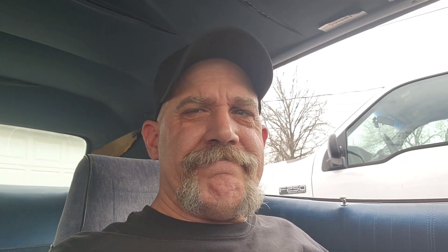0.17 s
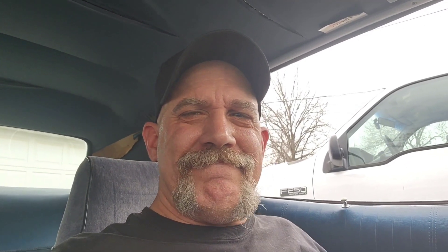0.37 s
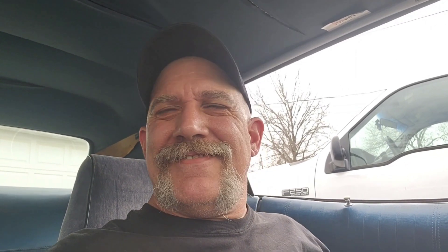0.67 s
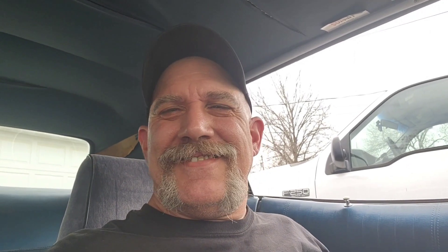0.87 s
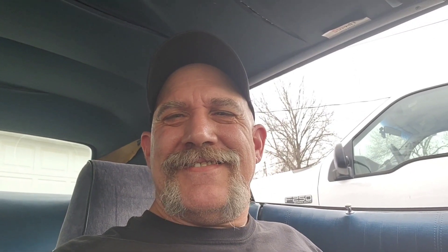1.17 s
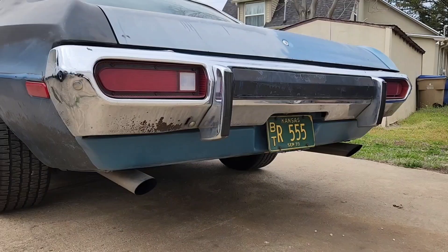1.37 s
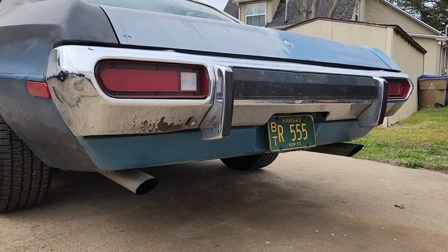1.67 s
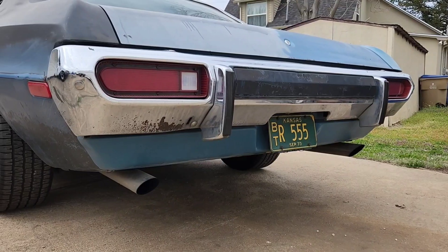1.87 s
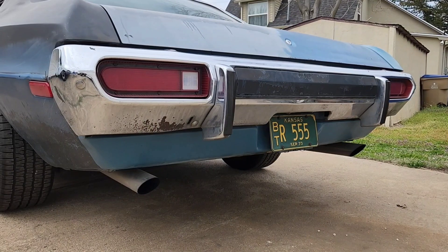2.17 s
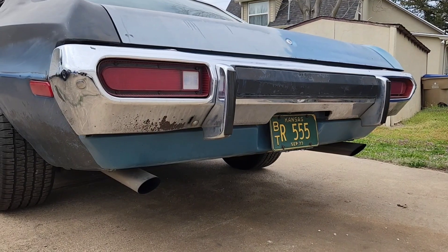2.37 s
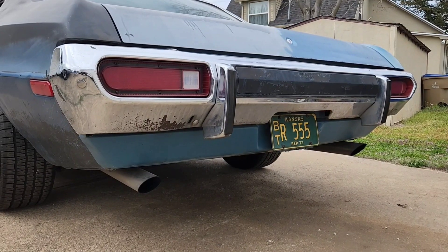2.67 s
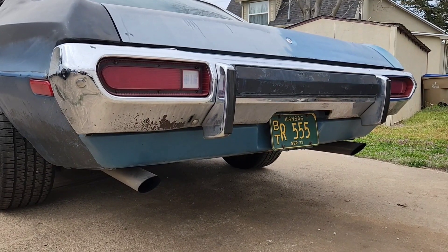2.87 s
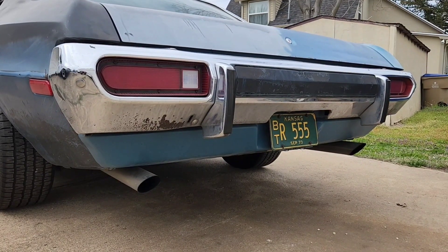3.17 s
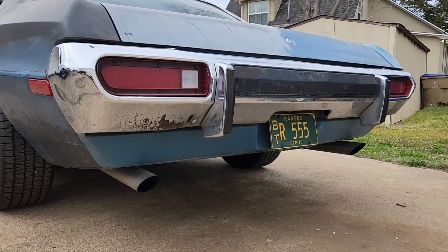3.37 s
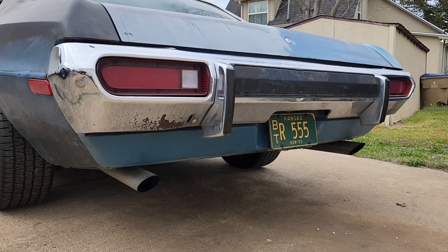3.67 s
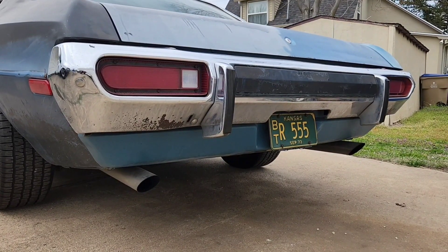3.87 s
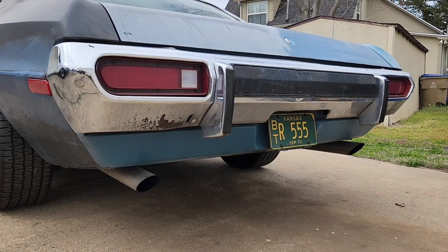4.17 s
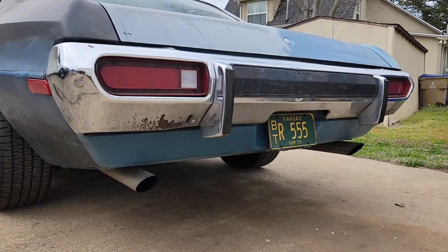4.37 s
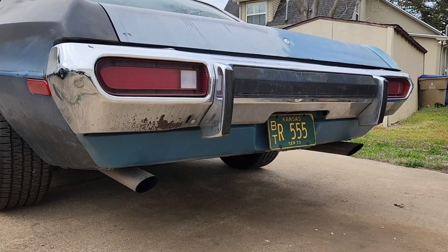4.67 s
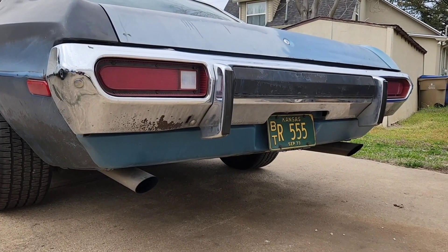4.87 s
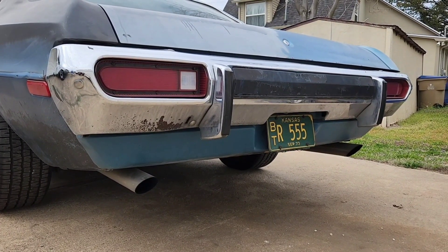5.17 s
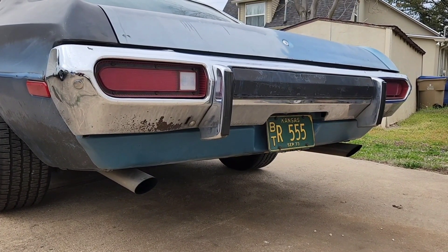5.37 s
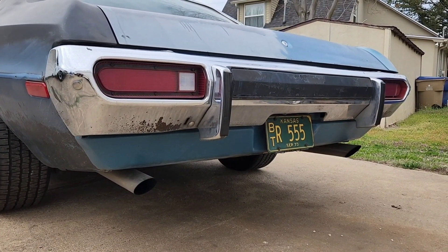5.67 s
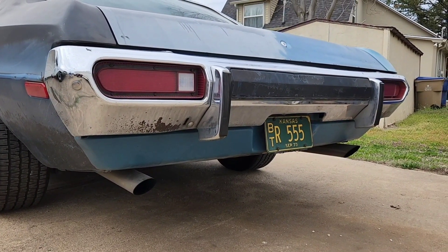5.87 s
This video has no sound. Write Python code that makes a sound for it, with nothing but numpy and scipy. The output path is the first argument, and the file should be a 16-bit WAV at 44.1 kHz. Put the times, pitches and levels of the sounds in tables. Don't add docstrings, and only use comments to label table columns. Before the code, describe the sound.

After faint birds and cabin rustling, a starter clanks and labours behind an old car; its engine fires raggedly and burbles at a fast idle.

```python
import sys
import numpy as np
from scipy import signal
from scipy.fft import rfft, irfft
from scipy.io import wavfile
from scipy.ndimage import uniform_filter1d

SR = 44100
rng = np.random.default_rng(int(sys.argv[2]) if len(sys.argv) > 2 else 0)


def persist_wave(psi):
    counts = np.round(np.clip(psi, -1, 1) * 32767).astype(np.int16)
    wavfile.write(sys.argv[1], SR, np.atleast_2d(counts).T)


def magnitude_from_level(level_db):
    exponent = np.asarray(level_db, float) / 20
    return 10 ** exponent


N = 265437
T = np.arange(N) / SR
CABIN_END_S, YARD_START_S = 1.306, 1.317


def evened(x):
    return x / np.sqrt(np.mean(x ** 2) + 1e-20)


def read(points, hz):
    f, value = np.transpose(points)
    return np.interp(np.log(hz + 1), np.log(f + 1), value)


def curve(rows):
    s, value = np.transpose(rows)
    return np.interp(T, s, value)


# (frequency [Hz], likeness [0-1])
SAME = [(60, 0.98), (300, 0.8), (640, 0.75), (1400, 0.3), (3000, 0.18), (8000, 0.24)]


def noise(spectrum, patchy_db=2.5):
    frames, hz = N // 256 + 5, np.fft.rfftfreq(1024, 1 / SR)
    a, b, c, d, patches = rng.standard_normal((frames, 513, 5)).T
    patches = uniform_filter1d(patches, size=10, axis=0)
    patches = evened(uniform_filter1d(patches, size=8, axis=1))
    same = np.clip(read(SAME, hz), 0, 1)[:, None]
    left = a + 1j * b
    right = same * left + np.sqrt(1 - same ** 2) * (c + 1j * d)
    z = np.array([left, right]) * magnitude_from_level(read(spectrum, hz)[:, None] + patchy_db * patches)
    return evened(signal.istft(z, nperseg=1024, noverlap=768)[1][:, :N])


def hiss_source(common=0.0):
    return rng.standard_normal((2, N)) + common * rng.standard_normal(N)


def ring(x, modes):
    out = 0
    for hz, width, db in modes:
        r = np.exp(-np.pi * width / SR)
        poles = [1, -2 * r * np.cos(2 * np.pi * hz / SR), r * r]
        out = out + magnitude_from_level(db) * signal.lfilter([1 - r], poles, x) * hz / SR
    return out


def train(s, size):
    return np.bincount(np.round(s * SR).astype(int), size, N)[:N]


def puff(clicks, rise_s, fall_s):
    t = np.arange(4000) / SR
    shape = np.exp(-t / fall_s) - np.exp(-t / rise_s)
    return np.sqrt(abs(signal.oaconvolve(clicks ** 2, shape)[:N]))


def lay(sounds):
    out = np.zeros((2, N))
    for s, sound in sounds:
        out[:, round(s * SR):][:, :sound.shape[-1]] += sound
    return out


# (frequency [Hz], density [dB per Hz])
CABIN = [(12, -49), (20, -15.5), (62, 9), (87, -8.5), (184, -26), (583, -36.5), (632, -27.5), (762, -37),
         (895, -33), (1610, -34), (1840, -26.5), (3060, -22.5), (4340, -37), (5230, -31.5), (7900, -43.5),
         (8700, -53), (15600, -72), (22000, -120)]
YARD = [(12, -34), (20, -19), (60, 4), (114, -9.5), (248, -32), (423, -45), (471, -44), (1790, -36.5),
        (3060, -25), (4580, -36), (5100, -29), (7800, -54), (8600, -70), (15600, -101), (22000, -120)]


def air():
    cabin = magnitude_from_level(-52.5) * noise(CABIN, patchy_db=3.5) * (T < CABIN_END_S)
    yard = magnitude_from_level(-51) * noise(YARD, patchy_db=-3.0) * (T > YARD_START_S)
    return cabin + yard


# (frequency [Hz], width [Hz], level [dB])
SETTLE = [(363, 59, -8), (530, 39, -4), (900, 39, -13), (1090, 150, -2.5), (1610, 58, 1), (1730, 150, -8),
          (2150, 90, 6.5), (2360, 49, -7), (2800, 52, -17), (3210, 27, -34), (3660, 86, -14),
          (4240, 42, -31)]
# (time [s], level [dB], t60 [s])
SETTLES = [
    (0, -47.5, 0.67),
    (1.318, -54.5, 0.8),
]


def settling_hiss():
    level = sum(magnitude_from_level(db - 60 * abs(T - s) / t60) * (T >= s) for s, db, t60 in SETTLES)
    return evened(ring(hiss_source(), SETTLE)) * level


def bird(s, length, hz, slide_hz, db):
    slide_s, edge_s, echo_db, echo_t60_s = 0.0236, 0.013, -41.5, 0.57
    t = np.arange(0, length, 1 / SR)
    waver, flutter = uniform_filter1d(rng.standard_normal((2, 12000)), size=200)[:, :len(t)]
    level = magnitude_from_level(db + 1.1 * evened(flutter)) * np.clip(np.minimum(t, length - t) / edge_s, 0, 1)
    pitch = (hz + slide_hz * np.exp(-t / slide_s)) * (1 + 0.0061 * evened(waver))
    tone = np.sqrt(2) * level * np.sin(2 * np.pi * np.cumsum(pitch) / SR)
    echo = rng.standard_normal(3000) * magnitude_from_level(echo_db - 60 * np.arange(3000) / SR / echo_t60_s)
    echo[0] = 1
    end = round((CABIN_END_S - s) * SR) if s < CABIN_END_S else None
    return s, signal.fftconvolve(tone, echo)[:end]


# (start [s], length [s], pitch [Hz], opening slide from above [Hz], level [dB])
BIRDS = [(0.22, 0.049, 4550, 20, -55), (.345, 0.046, 5100, -250, -43), (0.333, 0.064, 3370, -55, -58),
         (0.425, 0.092, 3440, 17, -56), (0.426, 0.11, 5830, 150, -60), (1.035, .03, 9000, 20, -75),
         (1.06, 0.047, 8750, 100, -75), (1.35, .05, 6840, -100, -75), (1.395, .03, 8350, 20, -74),
         (1.72, .04, 9950, 20, -87), (1.835, .04, 4700, 50, -64), (1.106, 0.047, 5300, 254, -47.5),
         (1.145, 0.11, 6050, -100, -64), (1.14, 0.056, 7850, -200, -67), (1.195, 0.036, 7200, 200, -62),
         (1.22, 0.04, 6400, -100, -66), (1.227, 0.062, 4680, 202, -46.5), (1.235, .035, 7750, -100, -67),
         (1.281, 0.028, 3100, -150, -55), (1.283, .025, 6050, 20, -63), (1.378, 0.048, 5710, 98, -54.5),
         (1.465, 0.06, 5560, 20, -61), (1.516, 0.089, 5480, 120, -49), (1.585, 0.049, 5640, -120, -53),
         (1.616, 0.035, 5460, 100, -47.5), (1.665, 0.23, 4080, 250, -54.5), (1.72, .04, 6620, 17, -72),
         (1.81, .05, 10700, 20, -81), (1.84, .04, 7200, 500, -71), (1.88, 0.04, 8200, -100, -68)]


def birds():
    return lay([bird(*b) for b in BIRDS])


def rustle(s, db, hz, width, length):
    cloth = [(hz, width, 0)]
    scrape = ring(ring(rng.standard_normal((2, 4000)), cloth), cloth)[:, -round(length * SR):]
    swell = np.sin(np.pi * np.linspace(0, 1, scrape.shape[1]) ** 0.82) ** 2
    return s, magnitude_from_level(db) * evened(scrape) * swell


# (time [s], level [dB], centre [Hz],
# width [Hz], length [s])
RUSTLES = [(0.25, -56, 4020, 1200, 0.036), (0.31, -55, 2770, 3000, 0.086), (0.37, -49, 3860, 990, 0.061),
           (0.44, -56.5, 1190, 805, 0.016), (0.475, -55, 2740, 800, 0.046), (0.528, -47.5, 600, 935, 0.05),
           (0.304, -64, 600, 300, 0.085), (0.686, -62, 2800, 1000, 0.036), (0.817, -68, 3000, 800, 0.026),
           (0.861, -60.5, 6700, 5000, 0.031), (0.89, -61, 2800, 1000, 0.055), (0.99, -60, 2900, 900, 0.03),
           (1.104, -53, 3000, 5000, 0.0064), (1.113, -57, 2900, 1200, 0.069),
           (1.396, -59, 4060, 1200, 0.063), (1.473, -57, 2690, 800, 0.052), (1.772, -66, 507, 120, 0.096),
           (1.852, -65, 493, 120, 0.11), (0.607, -58, 2420, 1500, 0.017)]


def rustles():
    return lay([rustle(*r) for r in RUSTLES])


def bump(s, db, hz, length):
    t = np.arange(round(length * SR)) / SR
    return s, magnitude_from_level(db) * np.sin(2 * np.pi * hz * t) * np.sin(np.pi * (t / length) ** 0.42) ** 2


# (time [s], level [dB], pitch [Hz], length [s])
BUMPS = [
    (0.59, -28.5, 139, 0.051),
    (1.098, -41.5, 73, 0.072),
]


def bumps():
    return lay([bump(*b) for b in BUMPS])


def load_gain(clash_db, clash_fall_db_per_s, crank_db, tiring_db_per_s, stroke_db):
    since = T - 1.944
    rise = magnitude_from_level(954 * np.minimum(since, 0)) * (since > -.032)
    clash = magnitude_from_level(clash_db - clash_fall_db_per_s * np.maximum(since, 0))
    strain = np.cos(2 * np.pi * (T - 2.1) / 0.18)
    crank = magnitude_from_level(crank_db + tiring_db_per_s * since + stroke_db * strain)
    return rise * np.hypot(clash, crank) * np.clip((2.385 - T) / 0.028, 0, 1)


def overrun_gain():
    drag_db, coast_db, release_s, stop_s = -26.5, -34.5, 2.545, 2.775
    edges = np.clip((T - 2.33) / 0.02, 0, 1) * np.clip((stop_s - T) / 0.043, 0, 1)
    released = np.clip((T - release_s) / 0.012 + .5, 0, 1)
    soft_db = -4.5 * (T < 2.385)
    return edges * magnitude_from_level(drag_db + (coast_db - drag_db) * released + soft_db)


# (time [s], rate [Hz])
PINION = [
    (1.92, 1406),
    (2.06, 1300),
    (2.13, 1198),
    (2.2, 880),
    (2.265, 1113),
    (2.33, 942),
    (2.6, 1325),
]


def pinion_teeth():
    waver = evened(uniform_filter1d(rng.standard_normal(N), size=300))
    phase = np.cumsum(curve(PINION) * (1 + .03 * waver)) / SR
    return np.diff(np.floor(phase), prepend=0) * magnitude_from_level(4.3 * rng.standard_normal(N))


def heave():
    rumble = noise([(20, -1), (45, -1), (86, 5.5), (130, -7), (250, -15), (400, -67)])
    return load_gain(-35, 60, -35.5, -1, -2) * rumble


# (frequency [Hz], width [Hz], level [dB])
HOUSING = [(547, 8, 5), (670, 35, 3.5), (944, 160, -7.5), (1100, 340, -7.5), (1470, 170, -3.5)]


def whine(teeth):
    rattle = 1.25 * rng.standard_normal((2, N))
    return load_gain(-27, 99, -33, -1, 2.5) * evened(ring(evened(teeth) + rattle, HOUSING))


# (frequency [Hz], density [dB per Hz])
GRIND = [(150, -24), (250, 3), (475, -20), (546, -4.5), (660, -5), (785, -21), (984, -8), (1170, -11.5),
         (1570, -12), (1740, -5), (3090, -6.5), (5290, -6), (8600, -21.5), (14500, -21), (15800, -39)]


def grind(teeth):
    scrape = noise(GRIND, patchy_db=1.6) * (0.65 + evened(puff(teeth, .0001, 0.0014)) * 0.18)
    dull = signal.sosfilt(signal.butter(1, 9000, fs=SR, output="sos"), scrape)
    loaded = np.where(T < 2.0, scrape, dull) * load_gain(-19.5, 302, -42, 11, 2)
    dragged = np.roll(scrape, SR // 2, axis=1) * overrun_gain()
    return magnitude_from_level(4.5) * (loaded + dragged)


# (frequency [Hz], level [dB], t60 [s])
CLANG = [(556, 0, .25), (1480, -4, .15), (1590, -2, .3), (2070, -3, .12)]


def clang():
    t = np.maximum(T - 1.944 + .015, 0)
    tones = sum(magnitude_from_level(-26 + db - 60 * t / t60) * np.sin(2 * np.pi * hz * t) for hz, db, t60 in CLANG)
    return tones * np.minimum(t / 0.0057, 1)


# (time [s], level [dB], pitch [Hz], length [s])
GROANS = [(2.0, -28.5, 128, 0.19), (1.955, -31, 81, 0.13), (2.09, -28, 83, .17), (2.09, -31, 45, 0.25),
          (2.25, -30, 84, .11), (2.15, -37, 215, 0.092), (2.25, -46, 530, 0.069), (2.07, -43, 2300, 0.095),
          (2.06, -36, 645, 0.085), (2.1, -51, 650, .06), (4.7, -38, 1400, .05)]


def groans():
    return lay([bump(*g) for g in GROANS])


# (frequency [Hz], width [Hz], level [dB])
SQUEAL = [(5400, 120, 0), (1480, 90, -5)]


def squeal():
    start_s, start_db, fade_db_per_s = 2.385, -21.5, 122
    level = magnitude_from_level(start_db - fade_db_per_s * abs(T - start_s)) * (T > start_s)
    return evened(ring(hiss_source(), SQUEAL)) * level


def starter():
    teeth = pinion_teeth()
    return heave() + whine(teeth) + grind(teeth) + clang() + groans() + squeal()


def warming(idle_db, db_per_s):
    return idle_db + db_per_s * np.maximum(T - 4, 0)


def blow_level_db():
    return warming(-12.5, 1.07)


def silencer_level_db():
    return warming(-29, 3)


def hiss_level_db():
    return warming(-33.5, 0.7)


# (frequency [Hz], density [dB per Hz])
BAY = [(190, 5), (330, -3.5), (376, -11.5), (683, -13), (765, -38), (857, -6), (1130, -22), (1440, -12.5),
       (1690, -20.5), (5250, -16), (6910, -28), (13000, -32.5), (15000, -44), (15800, -33)]


def engine_bay():
    return noise(BAY, patchy_db=1.2) * magnitude_from_level(hiss_level_db() + 5) * np.clip((T - 2.38) / 0.021, 0, 1)


# (time [s], spit level [dB], blow level [dB])
CATCH = [(2.3808, -11.5, -2.5), (2.4175, -21, -4), (2.4383, -8, -5), (2.4589, -22, -7), (2.4781, -7, -4),
         (2.4985, -9, -11.5), (2.5157, -27, -6.5), (2.5291, -7, -15), (2.5617, -24, -5.5),
         (2.6211, -19, -7), (2.6507, -16, -58), (2.672, -19.5, -14), (2.6994, -14.5, -7), (2.731, -21, -26),
         (2.747, -17, -54), (2.7765, -23, -13), (2.809, -24.5, -15), (2.8417, -30, -15.5),
         (2.8734, -29, -14)]
FIRST_S, FIRST_SPIT_DB, FIRST_BLOW_DB = np.transpose(CATCH)
# (frequency [Hz], density [dB per Hz])
SPIT = [(530, -59), (900, -13.5), (1010, -2.5), (1120, -12.5), (1440, -8.5), (1660, -20), (2010, -8),
        (2320, -23), (3790, -3), (5300, 1), (6980, -17), (12900, -18), (15800, -33)]
# (frequency [Hz], width [Hz], level [dB])
TIP = [(2900, 370, 12), (3826, 240, 1.5), (4420, 140, -39), (5680, 220, -17.5)]
# (time [s], level [dB])
SPURTS = [(2.906, 6.5), (2.982, 4.5), (3.028, 1.5), (3.076, -5.5), (3.155, 4.5), (3.202, 3.5), (3.355, 0.5),
          (3.37, -2), (3.4, 2), (3.446, -5.0), (3.596, -4), (3.641, 2.5), (3.733, -6.0), (3.856, 4.0),
          (3.887, -14), (3.933, -1.5), (3.963, -8), (3.979, 3.5), (4.009, 3), (4.085, 1.5), (4.251, 3.5),
          (4.297, 2.5), (4.327, 1.5), (4.372, -7.5), (4.417, -10), (4.492, 4), (4.537, 0), (4.568, 1),
          (4.583, -1), (4.613, -13), (4.705, -3.5), (4.735, 2), (4.81, -4), (4.825, 3.5), (4.9, 3.5),
          (4.974, 5.5), (5.049, 1), (5.093, 3), (5.137, 3), (5.182, -1), (5.211, 1), (5.255, -0.5),
          (5.285, 2), (5.329, -13), (5.416, -10), (5.49, 1), (5.519, -2), (5.563, -3.5), (5.637, -17),
          (5.681, 3), (5.726, -7), (5.756, 1), (5.8, 2), (5.845, 1), (5.875, 4.5), (5.92, -27), (5.965, -6),
          (6.011, -1)]
FORE_DB = (-40, -9, -40, -7, -40, -40, -16, -40)


def tailpipe_hiss(s, heard_s, near, steady, spit_db, cylinder):
    lead_s, fore_s = .0013, .004
    spurt_db = 0.8 * rng.standard_normal(len(s))
    spurt_db += sum(db * (abs(s - at) < .006) * near for at, db in SPURTS)
    spits = train(heard_s - lead_s, steady * magnitude_from_level(spit_db + spurt_db)) * magnitude_from_level(hiss_level_db() + 8.5)
    spits += train(FIRST_S - lead_s, magnitude_from_level(FIRST_SPIT_DB - 4))
    fore = train(heard_s - lead_s - fore_s, steady * magnitude_from_level(np.array(FORE_DB)[cylinder]))
    fore = fore * magnitude_from_level(hiss_level_db() + 9.5)
    gush = np.hypot(1.2 * puff(spits, .0008, .0022), 1.3 * puff(fore, .0005, .0012))
    hiss = gush * noise(SPIT, patchy_db=4.5) * magnitude_from_level(2.0)
    return hiss + magnitude_from_level(18) * ring(hiss, TIP)


def bang():
    u = np.arange(-200, 201) / SR / 0.00099
    clicks = train(FIRST_S + .0014, magnitude_from_level(FIRST_BLOW_DB - 5.5))
    return signal.oaconvolve(clicks, -u * np.exp(-u ** 2 / 2), "same")


# (place [firing steps], sign [+-1], level [dB])
KNOCKS = [(.3, 1, -5), (.95, -1, -6), (1.65, 1, -6), (2.75, -1, -1.5), (3.3, 1, -4.5), (3.7, -1, -7),
          (4.15, 1, -11), (4.65, -1, -10), (5.15, 1, -10), (5.65, -1, 0), (6.2, 1, -5.5), (6.6, -1, -7),
          (7.1, 1, -11), (7.8, -1, -6)]
# (frequency [Hz], width [Hz], level [dB])
SHELL_MODES = [(454, 72, -7), (633, 140, -2), (600, 40, 3.5), (684.8, 19.4, 9), (990, 150, -4)]


def shell_knocks(turn):
    cycles = int(turn[-1]) // 8 + 1
    place, sign, knock_db = np.transpose(KNOCKS)
    place = (place + 8 * np.arange(cycles)[:, None] - 2).ravel()
    size = (sign * magnitude_from_level(knock_db + 1.5 * rng.standard_normal((cycles, len(sign))))).ravel()
    keep = (place > 14) & (place < turn[-1] - 1)
    struck = train(np.interp(place[keep], turn, T), size[keep])
    struck = struck + train(FIRST_S, magnitude_from_level(FIRST_BLOW_DB + 8.5))
    return magnitude_from_level(silencer_level_db() + 79) * ring(ring(struck, [(600, 450, 0)]), SHELL_MODES)


# (frequency [Hz], width [Hz], level [dB])
SILENCER = [(474, 15, -5), (570, 25, -8), (600, 36, 0), (669, 13.4, 5), (984, 57, -7), (1440, 45, -15.5)]


def silencer_roar(clack_s, burn, ring_db):
    uneven_db = 1.2 * rng.standard_normal(len(burn))
    rings = train(clack_s, .25 * burn * magnitude_from_level(ring_db + uneven_db)) * magnitude_from_level(silencer_level_db() + 11.0)
    rings += train(FIRST_S, magnitude_from_level(FIRST_BLOW_DB - 2.0))
    return magnitude_from_level(-12) * evened(ring(hiss_source(2), SILENCER)) * puff(rings, .002, .006)


CLACKS_DB = (-2, -12, -10, -12, -14, -5, -14, -9)


def baffle_clacks(clack_s, burn, cylinder):
    clacks = train(clack_s, burn * magnitude_from_level(np.array(CLACKS_DB)[cylinder])) * magnitude_from_level(silencer_level_db() - 3)
    first_db = (FIRST_SPIT_DB + FIRST_BLOW_DB) / 2 + np.where(FIRST_S < 2.59, -7, -19.5)
    clacks = clacks + train(FIRST_S, magnitude_from_level(first_db + 6.5))
    tip = evened(ring(hiss_source(0.78), [(1450, 67, 7.5), (1021, 21, 1)]))
    return tip * puff(clacks, 0.0019, 0.0035)


def pipe(clicks, modes, direct):
    t = np.arange(SR // 2) / SR
    slug = t[:600] * np.exp(-t[:600] / .0009)
    body = sum(size * magnitude_from_level(-60 * t / t60) * np.cos(2 * np.pi * hz * t) for hz, t60, size in modes)
    body[0] += direct
    out = signal.fftconvolve(signal.oaconvolve(clicks, slug / slug.sum()), body)[:N]
    return signal.sosfilt(signal.butter(3, 350, fs=SR, output="sos"), out)


# (frequency [Hz], t60 [s], size [signed])
NEAR_PIPE = [(43, .4, .024), (62, .4, -.029), (89.2, .4, -.145), (116.3, .4, -.169), (164.3, .108, -.368),
             (184.7, .4, .053), (230.6, .343, -.06), (291, .4, -.013)]
FAR_PIPE = [(47, .051, -.239), (72.8, .05, .234), (90.4, .4, -.173), (111.6, .4, -.022), (161.6, .4, .07),
            (168.3, .4, -.141), (244, .276, -.055), (271, .4, -.021)]


def exhaust_blows(s, near, size):
    level = magnitude_from_level(blow_level_db() + 12.5)
    near_blows = train(s, size * near) * level + train(FIRST_S, magnitude_from_level(FIRST_BLOW_DB + 7.5))
    far_blows = train(s, size * ~near) * level
    return pipe(near_blows, NEAR_PIPE, 0.6) + pipe(far_blows, FAR_PIPE, 7.0)


# (time [s], speed [rpm])
SPEED = [(2.6, 962.4), (2.828, 1043.8), (3.056, 940.1), (3.284, 980.4), (3.512, 1004.2), (3.74, 971.7),
         (3.968, 983.0), (4.196, 993.6), (4.424, 1000.7), (4.652, 982.5), (4.88, 1005.5), (5.108, 1013.9),
         (5.336, 1025.5), (5.564, 1019.3), (5.792, 1005.7), (6.02, 991.8)]
# (bank [1 near, 0 far], blow [size], spit level [dB], silencer ring level [dB])
CYLINDERS = [
    (0, 1.6, -12, -2.5),
    (1, .57, -.5, -4),
    (0, .5, -12, 1),
    (1, 1.12, -3, -3),
    (1, .98, -3, -11),
    (0, .5, -9, 2.5),
    (1, 1.43, 0, -3.5),
    (0, 1.16, -11, -3),
]
# (time [s], level [dB])
WEAK = [
    (3.889, -2),
    (4.615, -8),
    (4.79, -3),
    (5.331, -2.5),
    (5.64, -27),
    (5.922, -8),
]


def engine():
    steady_s = 2.89
    near_turn, far_turn, far_spit_turn, clack_turn = .579, .015, .82, 0.54
    turn = np.cumsum(curve(SPEED) * (T >= SPEED[0][0])) / 15 / SR
    step = np.arange(int(turn[-1]))
    cylinder = (step + 2) % 8
    near, blow, spit_db, ring_db = np.array(CYLINDERS)[cylinder].T
    near = near > .5
    s = np.interp(step + np.where(near, near_turn, far_turn), turn, T)
    heard_s = np.interp(step + np.where(near, near_turn, far_spit_turn), turn, T)
    clack_s = np.interp(step + clack_turn, turn, T)
    burn_db = 0.6 * rng.standard_normal(len(s)) + sum(db * (abs(s - at) < .006) for at, db in WEAK)
    burn = magnitude_from_level(burn_db) * (~near | (s > steady_s))
    steady = np.where(near, s > steady_s, burn)
    out = engine_bay() + tailpipe_hiss(s, heard_s, near, steady, spit_db, cylinder)
    out = out + bang() + shell_knocks(turn)
    out = out + silencer_roar(clack_s, burn, ring_db) + baffle_clacks(clack_s, burn, cylinder)
    return out + exhaust_blows(s, near, blow * burn)


def scene():
    return air() + settling_hiss() + birds() + rustles() + bumps() + starter() + engine()


def top_cut(x):
    return signal.sosfilt(signal.butter(12, 15920, fs=SR, output="sos"), x)


# (frequency [Hz], left minus right [dB])
BALANCE_DB = [(60, 1.5), (110, 0.0), (200, -0.5), (380, 1), (700, -2.5), (1290, 0), (2380, -4), (4400, -5),
              (8120, 7.5), (15000, 6.5)]


def record(dry):
    hz = np.fft.rfftfreq(2 * N, 1 / SR)
    tilt = magnitude_from_level(read(BALANCE_DB, hz) / 2)
    band = (hz < 15850) * hz ** 2 / np.hypot(hz ** 2, 38 ** 2)
    late = np.exp(-2j * np.pi * hz * 0.0002945 * np.clip(hz / 2500, 0, 1))
    ports = irfft(rfft(dry, 2 * N) * band * np.array([tilt * late, 1 / tilt]))[:, :N]
    mix = np.clip(ports, -.96, .96)
    return top_cut(mix)


dry = scene()
out = record(dry)
persist_wave(out)
```